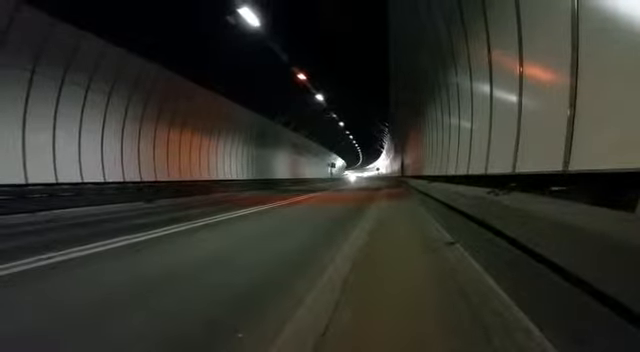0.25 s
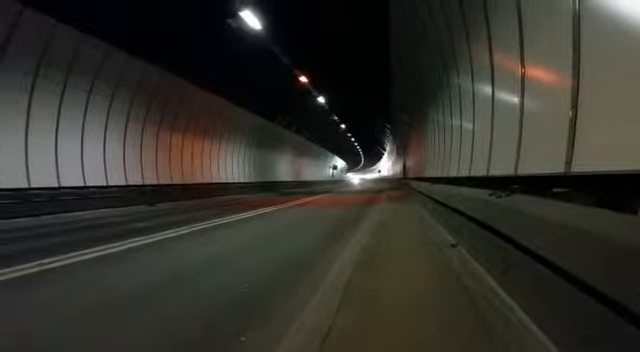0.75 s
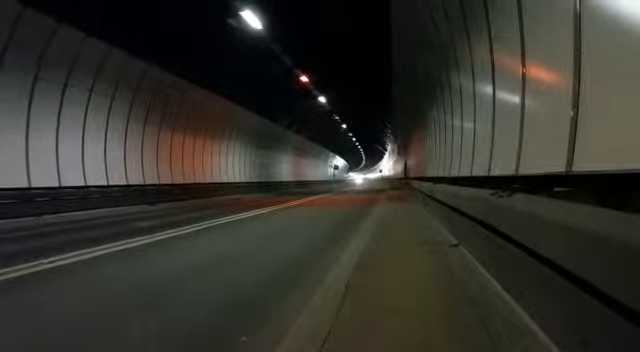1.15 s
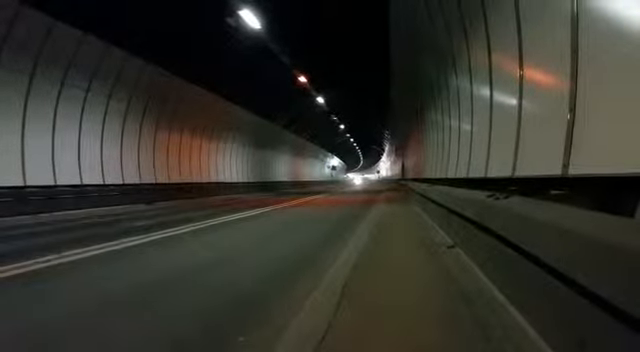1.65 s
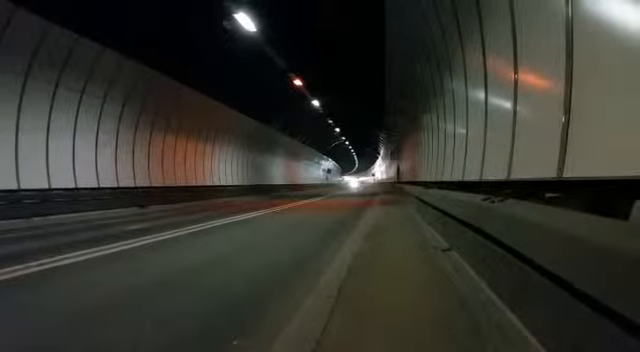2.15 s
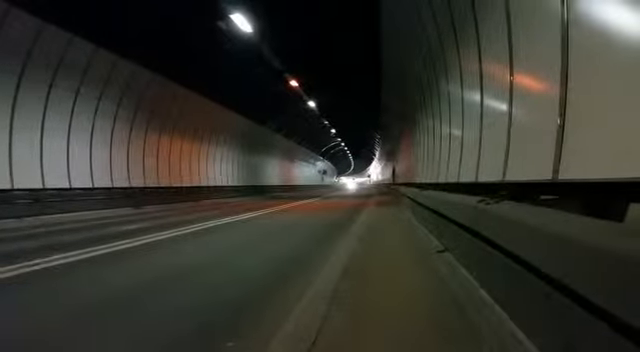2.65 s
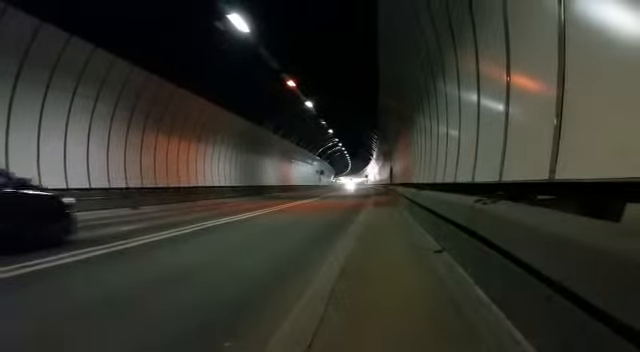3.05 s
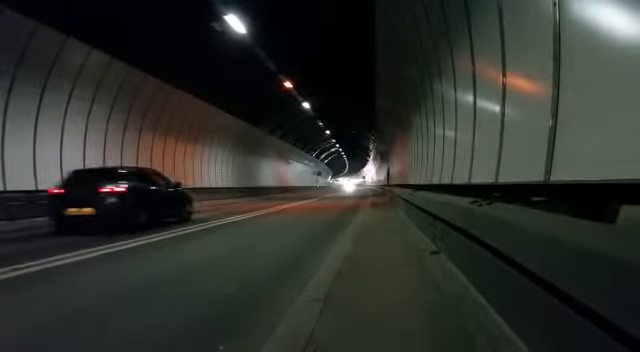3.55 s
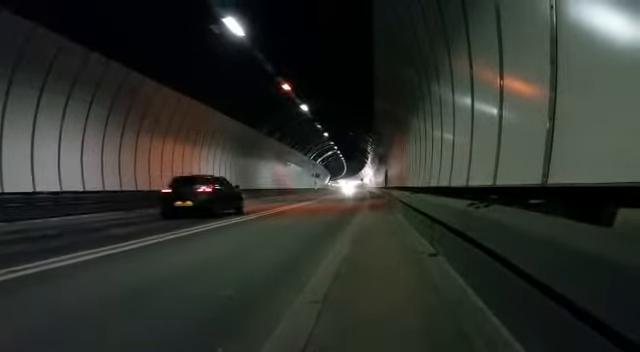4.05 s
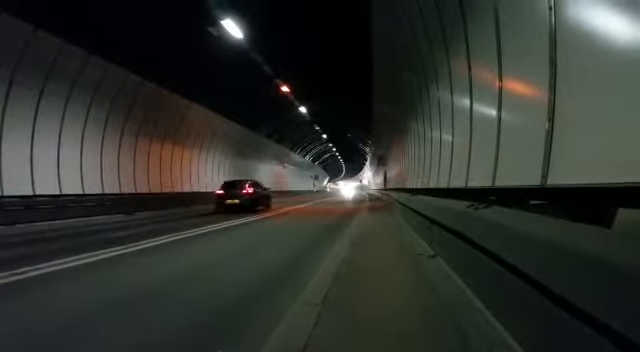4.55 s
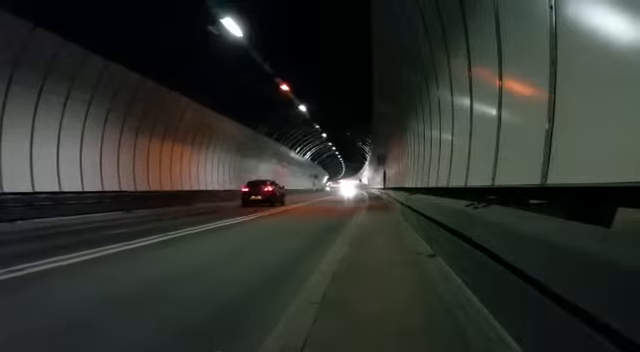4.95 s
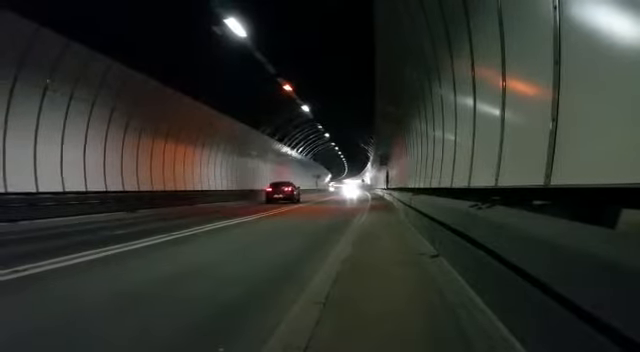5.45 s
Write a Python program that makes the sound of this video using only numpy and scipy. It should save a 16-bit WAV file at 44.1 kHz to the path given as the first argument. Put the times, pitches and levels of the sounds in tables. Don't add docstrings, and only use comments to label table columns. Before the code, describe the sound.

Inside a reverberant tunnel, loud exhaust drones rise one after another over a low hum, rushing tyres and a harsh final approach.

```python
import sys
import numpy as np
from scipy import signal
from scipy.fft import rfft, irfft, next_fast_len
from scipy.io import wavfile
from scipy.ndimage import uniform_filter1d

SR = 44100
rng = np.random.default_rng(int(sys.argv[2]) if len(sys.argv) > 2 else 0)


def log_audio(samples):
    frames = np.atleast_2d(samples).T
    limited = np.clip(frames, -1, 1)
    pcm = np.round(limited * 32767).astype(np.int16)
    wavfile.write(sys.argv[1], SR, pcm)


def voltage_ratio(decibels):
    exponent = np.asarray(decibels, float) / 20
    return 10 ** exponent


N = 251811


def rms_one(x):
    return x / np.sqrt(np.mean(np.abs(x) ** 2) + 1e-20)


def in_time(rows):
    s, *columns = np.transpose(rows)
    return [np.interp(np.arange(N) / SR, s, c) for c in columns]


def at_hz(points, hz):
    table_hz, values = np.transpose(points)
    return np.interp(np.log(hz + 1), np.log(table_hz), values)


def fade(rows):
    t = np.arange(N) / SR
    rise = np.clip((t - rows[0][0]) / .1 + .5, 0, 1)
    fall = np.clip((rows[-1][0] - t) / .1 + .5, 0, 1)
    return np.sqrt(rise * fall)


def drift(rate_hz, count, size=N):
    r = np.exp(-80 * np.pi * rate_hz / SR)
    noise = rng.standard_normal((count, N // 40 + 1002))
    slow = signal.lfilter([1], [1, -2 * r, r * r], noise)[:, 1000:]
    return np.array([np.interp(np.arange(size) / 40, np.arange(len(v)), rms_one(v)) for v in slow])


def echoed_tone(hz, blur_hz, blur, apart):
    a, b, c, d = drift(blur_hz, count=4, size=len(hz))
    mid = np.sqrt(1 - blur) + np.sqrt(blur / 2) * (a + 1j * b)
    side = apart * (c + 1j * d) * np.array([[1], [-1]])
    turning = np.exp(2j * np.pi * np.cumsum(hz) / SR)
    return np.sqrt(2) * np.real((mid + side) * turning)


def cancelling(nulls):
    t, gain = np.arange(0, N + 40, 40) / SR, 1
    depth, spread = .95, 1.6
    for s, half_s in nulls:
        gain = gain * (1 - depth * np.exp(-((t - s) / (spread * half_s)) ** 2))
    return np.interp(np.arange(N) / SR, t, gain)


# t/s, half width/s, level/dB
REINFORCED = [(.69, .025, 2.5), (.79, 0.026, 5), (0.924, .025, 3), (1.17, 0.043, 4), (1.45, .03, 5),
              (1.759, .025, 4.5), (2.19, 0.024, 3.5), (2.47, .035, 6), (2.6, .03, 5), (2.71, 0.027, 6.5),
              (2.941, .015, 4), (3.02, 0.027, 4), (3.19, 0.018, 4.5), (4.36, .02, 5), (4.91, 0.028, 3.5),
              (5.13, 0.028, 1.5), (5.57, 0.024, 2.5)]


def reinforcing():
    t = np.arange(N) / SR
    return voltage_ratio(sum(db * np.exp(-((t - s) / half_s) ** 2) for s, half_s, db in REINFORCED))


# t/s, half width/s
CANCELLED = [(0.646, 0.0077), (0.883, 0.0075), (0.995, 0.0037), (1.409, 0.019), (1.655, 0.016),
             (1.694, 0.0049), (1.881, 0.0047), (1.944, 0.0046), (1.987, 0.01), (2.11, 0.02), (2.256, 0.011),
             (2.532, 0.0086), (2.641, 0.01), (2.823, 0.015), (3.062, 0.011), (3.124, 0.0066),
             (3.347, 0.008), (3.518, 0.0034), (3.593, 0.008), (3.947, 0.006), (4.177, 0.0052),
             (4.228, 0.0048), (4.307, 0.0039), (4.393, 0.025), (4.806, 0.0038), (4.85, 0.012),
             (5.028, 0.0085), (5.5, 0.012)]
ORDER_QUARTERS = [2, 3, 5, 6, 7, 8, 9, 13]
ORDERS_DB = [
    (-29.5, -19.5, -21.5, -40.5, -15, -15, -21.5, -19.5),
    (-30.5, -18.5, -17, -11, -21.5, -10, -29, -14),
    (-35.5, -14, -19.5, -28.5, -16, -18.5, -24, -30.5),
]


def engine(speed, swell, orders_db, waver_hz):
    heard = fade(swell) > 0
    hz, level_db = in_time(speed)[0][heard], in_time(swell)[0][heard]
    wavering_hz = hz + waver_hz * drift(22, count=1, size=len(hz))[0]
    main = echoed_tone(wavering_hz, blur_hz=14, blur=.12, apart=.11)
    echo_gain = (cancelling(CANCELLED) * reinforcing())[heard]
    orders = voltage_ratio(level_db - 0.28) * echo_gain * main
    slow_db = uniform_filter1d(level_db, SR // 2) - 4.0
    for quarters, order_db in zip(ORDER_QUARTERS, orders_db):
        smeared = echoed_tone(hz * quarters / 4, blur_hz=1.3 * quarters, blur=.85, apart=.04 * quarters)
        orders += voltage_ratio(slow_db + order_db) * smeared
    out = np.zeros((2, N))
    out[:, heard] = orders
    return fade(swell) * out


# t/s, f/Hz
FIRST_SPEED = [(0, 256), (.2, 265), (.3, 259), (.55, 268), (.8, 262), (1.1, 271), (1.5, 267), (1.9, 258),
               (2.35, 260)]
# t/s, level/dB
FIRST_SWELL = [(0, -11.5), (.33, -5), (.55, -7), (.9, -15), (1.18, -10.5), (1.5, -14.5), (1.76, -17.5),
               (2.05, -13.5), (2.35, -19.5)]


def first_car():
    return engine(FIRST_SPEED, [(-1, -10)] + FIRST_SWELL, ORDERS_DB[0], waver_hz=3)


def low_note(rows, blur, blur_hz):
    hz, level_db = in_time(rows)
    return fade(rows) * voltage_ratio(level_db) * echoed_tone(hz, blur_hz, blur, apart=.04)


# t/s, f/Hz, level/dB
HUM = [(0, 77.8, -28), (.22, 78.5, -20.5), (.55, 75.08, -26), (1.1, 74.3, -31.5), (1.67, 73.53, -26),
       (2.15, 70.34, -22.5), (2.5, 69.8, -27.5), (2.7, 73.64, -28), (3.1, 67.24, -37.5), (3.5, 66.65, -36),
       (3.7, 70.85, -20.5), (3.95, 85.6, -34.5), (4.35, 84.7, -26.5), (5.0, 77.7, -32.5),
       (5.35, 75.8, -24.5), (5.71, 77.1, -32)]
# t/s, half width/s
HUM_CANCELLED = [(0.405, 0.052), (0.754, 0.027), (0.863, 0.019), (1.918, 0.028), (2.653, 0.0059),
                 (3.009, 0.039), (3.426, 0.018), (3.818, 0.06), (4.524, 0.015), (4.664, 0.032),
                 (5.022, 0.028), (5.628, 0.033)]


def distant_hum():
    rows = [(-1, 77, -26)] + HUM + [(7, 79, -30)]
    return cancelling(HUM_CANCELLED) * low_note(rows, blur=0.17, blur_hz=12)


# f/Hz, likeness/0-1
LIKENESS = [(60, 0.9), (110, 1), (210, 0.89), (400, 0.4), (750, 0.7), (1420, 0), (2680, 0.08), (5040, 0.05)]


def diffuse_noise(colour, patchy_db):
    size = next_fast_len(N)
    hz = np.fft.rfftfreq(size, 1 / SR)
    mid, side = rfft(rng.standard_normal((2, size)))
    alike = np.clip(at_hz(LIKENESS, hz), -1, 1)
    pair = np.sqrt(1 + alike) * mid + np.sqrt(1 - alike) * side * [[1], [-1]]
    shape = voltage_ratio(at_hz(colour, hz)) * (hz > colour[0][0]) * (hz < colour[-1][0])
    return rms_one(irfft(pair * shape)[:, :N]) * voltage_ratio(patchy_db * drift(8.2, count=1))


# nearest t/s, time scale coming/s, time scale going/s
PASSES = [
    (.97, 0.94, 0.25),
    (2.4, 0.26, 0.54),
    (2.9, .3, .45),
    (3.8, 0.48, 0.72),
    (4.55, .35, 0.52),
    (5.7, 0.63, .5),
]


def passing(steady_db, loss_db, *nearest_db):
    t, power = np.arange(N) / SR, voltage_ratio(2 * steady_db)
    for (s, coming, going), db in zip(PASSES, nearest_db):
        distance = np.hypot(1, (t - s) / np.where(t < s, coming, going))
        power = power + voltage_ratio(2 * (db - loss_db * np.log10(distance)))
    return np.sqrt(power)


# f/Hz, level/dB per Hz
GROWL = [(20, -40), (45, -27), (75, -9.5), (125, -19), (165, -9.5), (230, 5.5), (290, 2), (330, -13.5),
         (380, -30.5)]
GROWL_DB = (-24.5, 19.5, -23.5, -26, -21, -19.5, -22.5, -28)


def exhaust_growl():
    return voltage_ratio(2) * passing(*GROWL_DB) * cancelling(CANCELLED) * diffuse_noise(GROWL, patchy_db=2.0)


# f/Hz, level/dB per Hz
ROAR = [(250, -30), (380, -6), (450, -0.5), (570, 1.5), (650, -3.5), (1100, -2), (1500, -8.5), (2200, -16),
        (3500, -34)]
ROAR_DB = (-24, 24.5, -26, -29, -20.5, -20, -19, -23.5)


def tyre_roar():
    return passing(*ROAR_DB) * diffuse_noise(ROAR, patchy_db=-0.07)


# f/Hz, level/dB per Hz
HISS = [(900, -22.5), (1600, -3), (2100, -1), (3000, -7.5), (3600, -11.5), (4300, -16.5), (5500, -35.5)]
HISS_DB = (-49, 25, -32.5, -48.5, -37, -39, -31.5, -26.5)


def tyre_hiss():
    return voltage_ratio(2) * passing(*HISS_DB) * diffuse_noise(HISS, patchy_db=-0.23)


# f/Hz, level/dB per Hz
RUSH = [(4500, -8.5), (6000, 2), (7200, -2), (8100, 1), (9000, -5.5), (10500, -9.5), (12000, -16.5),
        (15700, -18)]
RUSH_DB = (-80, 36, -82.5, -64, -72.5, -80, -78, -70)


def air_rush():
    return voltage_ratio(6.5) * passing(*RUSH_DB) * diffuse_noise(RUSH, patchy_db=.4)


# f/Hz, level/dB per Hz
WAKE = [(4500, -9.5), (5500, -1.5), (7000, 1.5), (8200, -4), (9500, -14), (11000, -26)]
WAKE_DB = (-75.5, 36, -74, -69, -58.5, -70.5, -67.5, -55.5)


def air_wake():
    return passing(*WAKE_DB) * diffuse_noise(WAKE, patchy_db=.4)


# f/Hz, level/dB per Hz
SCREAM = [(2200, -19.5), (3300, -1), (4200, 3), (4700, -5), (5300, -9.5), (6200, -19.5), (7500, -28.5),
          (9000, -36), (11500, -53)]
SCREAM_DB = (-60, 34, -50, -55, -47.5, -51.5, -45, -30.5)


def near_scream():
    return passing(*SCREAM_DB) * diffuse_noise(SCREAM, patchy_db=-0.06)


# f/Hz, level/dB per Hz
SELF_NOISE = [(5000, -6), (8000, 0), (11000, -2), (12000, -6.5), (15700, -12.5)]


def self_noise():
    return voltage_ratio(-76.5) * diffuse_noise(SELF_NOISE, patchy_db=1.5)


# t/s, f/Hz, level/dB
PASSER = [(1.3, 109.3, -41), (1.38, 114.4, -23.5), (1.8, 145, -36.5), (2.4, 153, -26.5),
          (2.8, 167.2, -22.5), (3.6, 181.2, -25), (4.2, 189, -21), (4.64, 199.3, -17), (4.8, 205.6, -30.5)]


def passing_car():
    return low_note(PASSER, blur=.85, blur_hz=16)


# t/s, f/Hz
SECOND_SPEED = [(2.3, 260), (2.7, 266), (3.0, 284), (3.35, 286), (3.6, 277), (4.2, 286)]
# t/s, level/dB
SECOND_SWELL = [(2.35, -17.5), (2.46, -14.5), (2.71, -14.5), (2.9, -12.5), (3.2, -17), (3.6, -13),
                (4.0, -19), (4.2, -18)]


def second_car():
    return engine(SECOND_SPEED, SECOND_SWELL, ORDERS_DB[1], waver_hz=5)


# t/s, f/Hz
THIRD_SPEED = [(4.15, 252), (4.45, 261), (4.75, 260), (4.9, 270), (5.05, 276), (5.25, 268), (5.45, 276),
               (5.71, 280)]
# t/s, level/dB
THIRD_SWELL = [(4.2, -18.5), (4.359, -10.5), (4.6, -12), (4.8, -10.5), (4.91, -9), (5.04, -10),
               (5.25, -7.5), (5.55, -11.5), (5.71, -16.5)]


def third_car():
    return engine(THIRD_SPEED, THIRD_SWELL + [(7, -12)], ORDERS_DB[2], waver_hz=3)


def scene():
    engines = first_car() + second_car() + third_car()
    low_notes = distant_hum() + passing_car()
    traffic = exhaust_growl() + tyre_roar() + tyre_hiss()
    near_cars = air_rush() + air_wake() + near_scream()
    return engines + low_notes + traffic + near_cars + self_noise()


def low_pass(x):
    return signal.sosfilt(signal.butter(12, 15720, fs=SR, output="sos"), x)


# f/Hz, left minus right level/dB
LEAN = [(60, 1.5), (260, 2.5), (700, 2), (1900, 2.5), (3100, -0.2), (4500, -5), (8000, -9.5), (12000, -6.5)]


def record(dry):
    size = next_fast_len(N + SR)
    lean_db = at_hz(LEAN, np.fft.rfftfreq(size, 1 / SR)) / 2
    x = irfft(rfft(dry, size) * voltage_ratio(lean_db * [[1], [-1]]), size)[:, :N]
    full_db, squeeze, attack_s, release_s = -11.5, .4, .002, .012
    power = np.mean(x ** 2, axis=0)
    for seconds in (attack_s, release_s):
        r = np.exp(-1 / (seconds * SR))
        power = signal.lfilter([1 - r], [1, -r], power, zi=[r * voltage_ratio(2 * full_db)])[0]
    x = x * voltage_ratio(-squeeze * (10 * np.log10(power) - full_db))
    mix = 1.128 * np.tanh(x / 1.114)
    return low_pass(mix)


dry = scene()
out = record(dry)
log_audio(out)
```